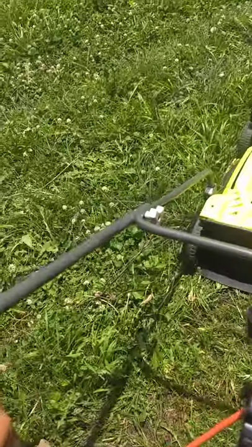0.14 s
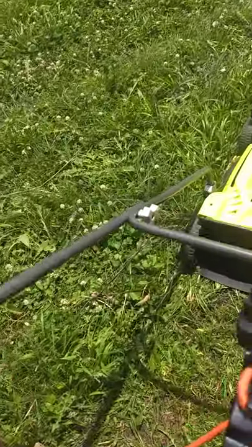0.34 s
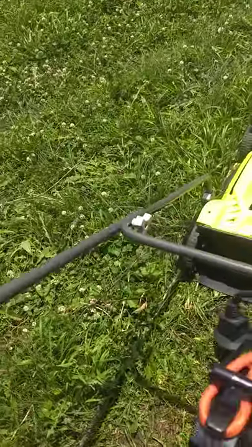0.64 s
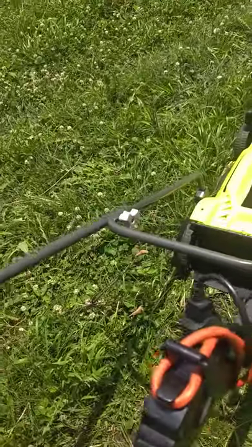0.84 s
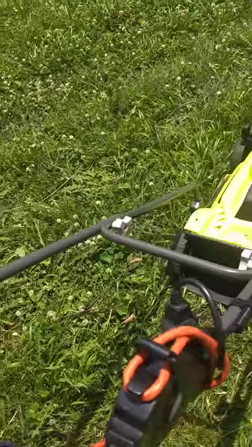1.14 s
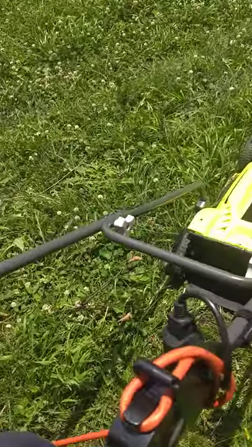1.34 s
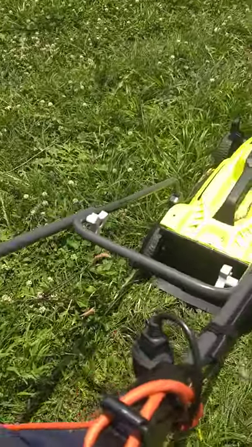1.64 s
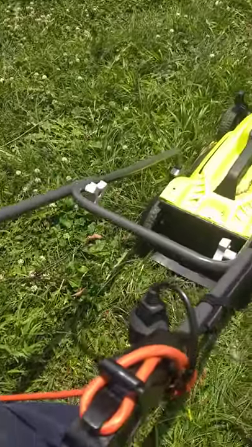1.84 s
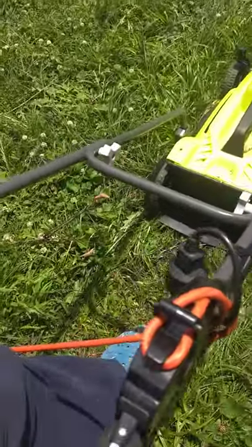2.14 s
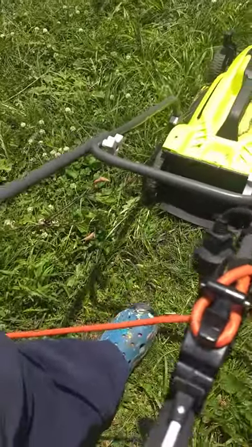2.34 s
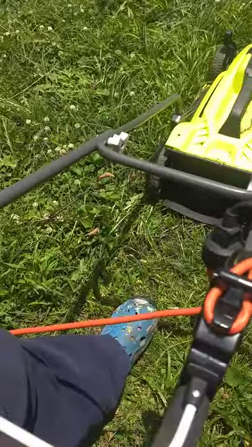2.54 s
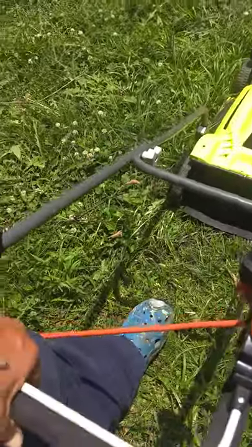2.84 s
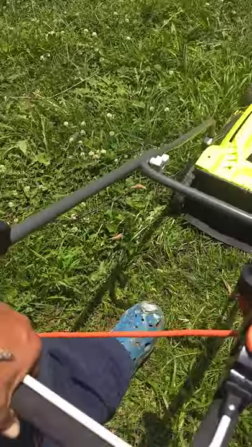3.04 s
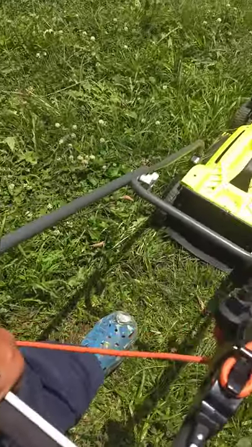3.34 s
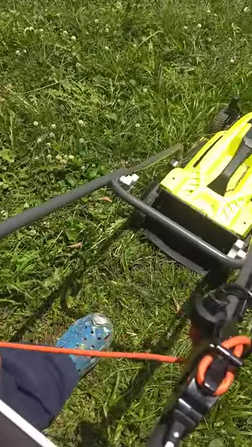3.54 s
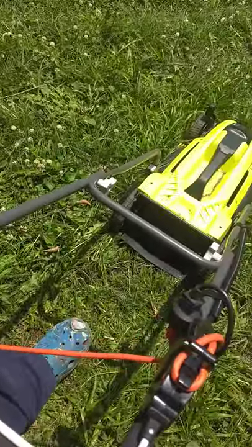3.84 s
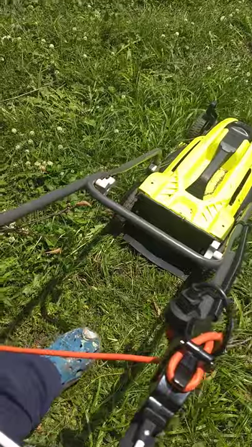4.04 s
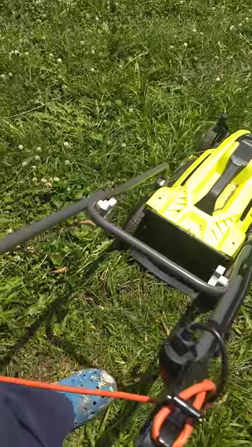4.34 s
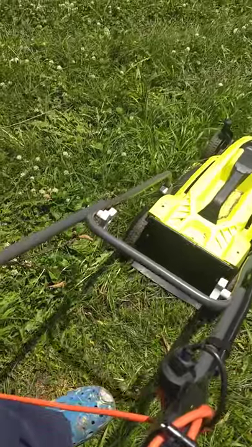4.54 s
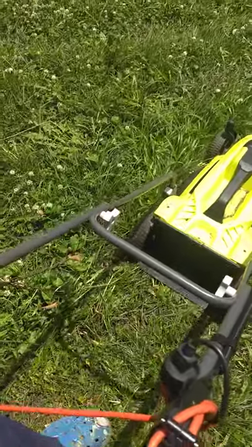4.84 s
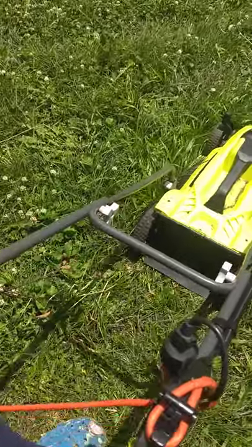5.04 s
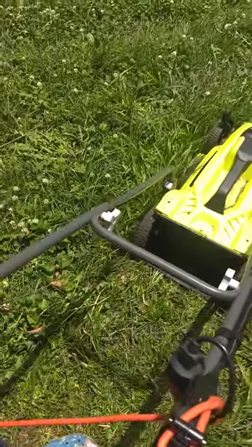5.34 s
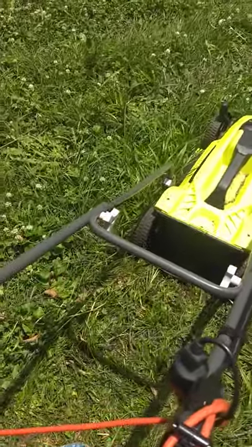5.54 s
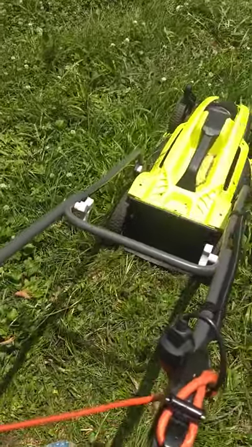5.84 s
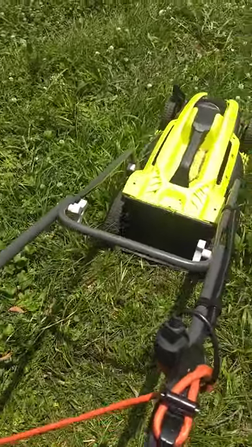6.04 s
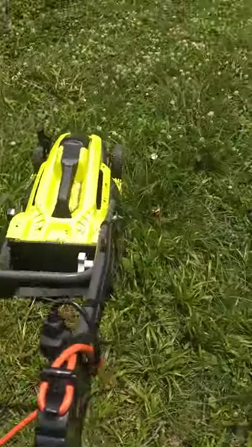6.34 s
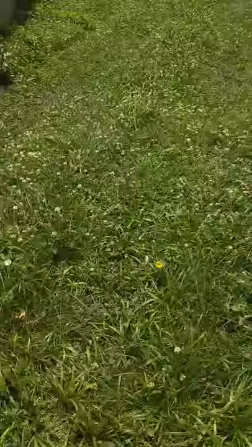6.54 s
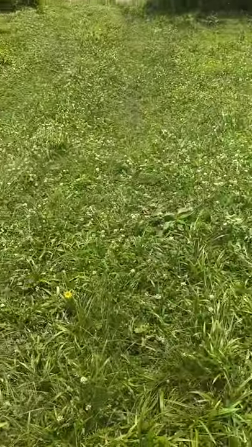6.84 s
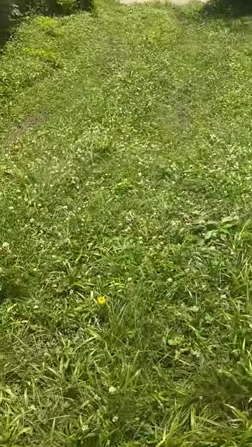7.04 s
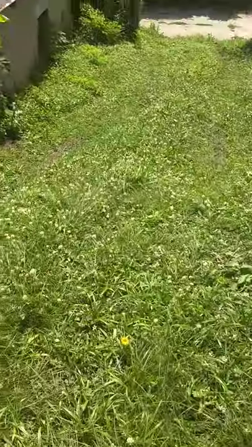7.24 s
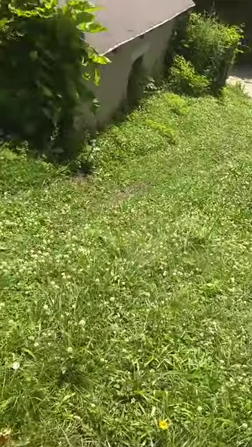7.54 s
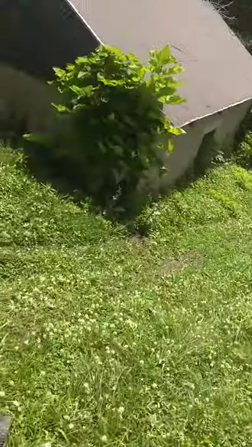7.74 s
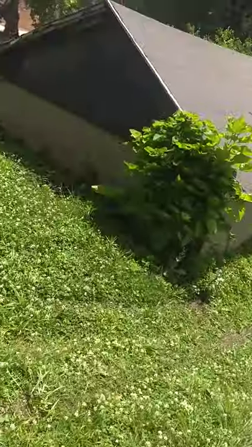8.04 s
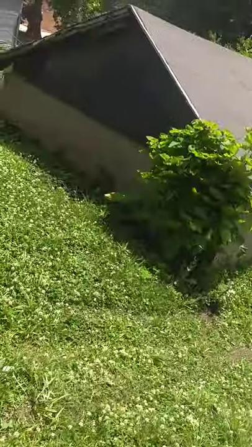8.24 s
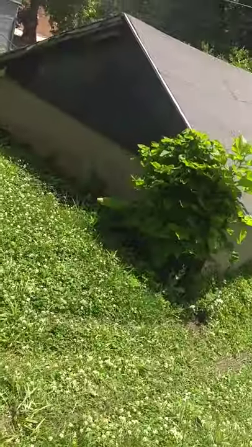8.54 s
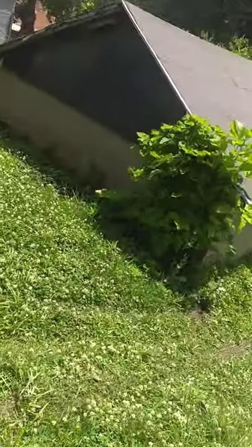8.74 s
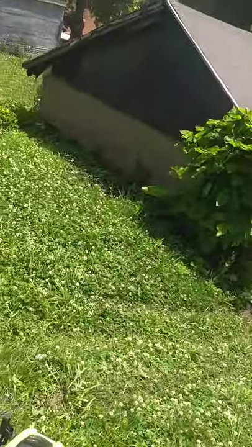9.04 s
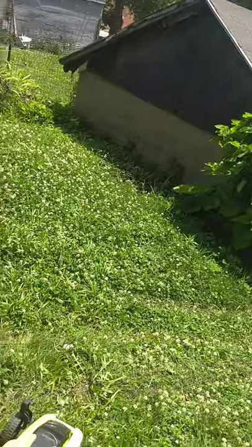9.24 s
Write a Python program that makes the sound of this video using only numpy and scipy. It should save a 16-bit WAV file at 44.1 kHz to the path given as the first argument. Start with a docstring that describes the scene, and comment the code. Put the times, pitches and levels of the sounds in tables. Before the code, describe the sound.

Outdoors on a lawn, a hand-held microphone close to a small electric mower. A steady buzzing hum, high motor whine and fluttering rush of cut grass sag and recover under load. Sharp plastic snaps come at the start and again in a cluster around six seconds, the motor briefly dipping behind some. Then the microphone turns away, the cutting softens, and low wind puffs arrive.

```python
"""A lawn of long grass: a corded electric mower cuts near a hand-held phone, its motor belted to a two-tipped blade.
Locked sine lines carry motor and blade, noise pulsed by the tips makes roar, cutting, swish and hiss; load sags the pitch.
Cord and handle snap as ringing noise bursts; the steady sound ducks after some snaps and creeps back.
Low noise puffs are wind on the two microphone ports. The phone turns away, and each channel subtracts
a late copy of the other port."""
import sys
import numpy as np
from scipy import signal
from scipy.fft import rfft, irfft, next_fast_len
from scipy.io import wavfile
from scipy.ndimage import uniform_filter1d

SR = 44100
rng = np.random.default_rng(int(sys.argv[2]) if len(sys.argv) > 2 else 0)


def amplitude_ratio(level_db):
    """Convert a level in decibels to the matching linear amplitude (field) ratio."""
    exponent = np.asarray(level_db, float) / 20
    return 10 ** exponent


def wav_out(sig):
    """Save sig, one row per channel (or a flat mono array), as 16-bit PCM at SR to the path in sys.argv[1]."""
    wavfile.write(sys.argv[1], SR, np.round(np.clip(np.atleast_2d(sig).T, -1, 1) * 32767).astype(np.int16))


N = 414099
T = np.arange(N) / SR

# Blade speed before smoothing: time_s, rate_passes_per_s
BLADE_SPEED = [(0.1, 102.9), (0.61, 106.4), (1.5, 109.1), (1.9, 108.9), (2.24, 106.1), (3.61, 110.1),
               (4.56, 110.5), (5.17, 103.8), (5.71, 102.5), (6.12, 99.0), (6.8, 99.7), (7.48, 106.1),
               (7.76, 107.4), (8.03, 107.2), (8.23, 106.1), (8.5, 103.1), (8.78, 101.9), (9.41, 103.0)]
# Blade lines, halves from the unequal tips: pass_rate_multiple, level_db (against their layer)
BLADE_LINES = [(1, -13), (2, -6), (2.5, -15.5), (3, -6), (3.5, -9), (4, -12), (5, -9.5), (6, -13.5),
               (7, -15.5), (8, -19), (9, -18), (10, -16)]
# Motor whine lines: shaft_rate_multiple, level_db (against the whine)
MOTOR_LINES = [(16, -5.5), (22, 0.5), (23.47, -14), (32, -8.5), (44, -12)]
# Colours of the noise layers, each normalised later: pitch_hz, relative_density_db
ROAR_COLOUR = [(40, -50), (150, -8.5), (190, -2.5), (330, 4.5), (470, 1.5), (700, -16), (1100, -34.5)]
CUT_COLOUR = [(350, -14), (600, 4), (950, -0.5), (1250, 3.5), (1800, 1), (2300, -12), (3200, -57)]
SWISH_COLOUR = [(1500, -26), (2400, 7), (3200, 2), (3850, 5.5), (5300, -9.5), (6300, -3.5), (7400, -5.5),
                (9500, -24)]
HISS_COLOUR = [(5000, -17), (8500, -14), (10500, -4.5), (14000, -2)]
PUFF_COLOUR = [(20, -18), (60, 2), (140, 8), (250, -0.5), (800, -36)]
WHISTLE_COLOUR = [(3550, -23), (3790, -5.5), (4050, -29.5)]
# Left port against right: pitch_hz, likeness_0_to_1, facing_db, facing_lag_rad, turned_db, turned_lag_rad
PORT_PATHS = [(197, 1, 0.5, 0.17, 1.5, 0.38), (664, 0.95, -6, 0.3, -7.5, 1.25),
              (990, 0.83, -2.5, 0, -0.5, 1.3), (1377, 1, -5.5, 0.75, -4, 2.55),
              (1550, 0.97, -19.5, 2, -5, 2.55), (2650, 0.93, -6, -1.5, -2, 4.4),
              (4130, 0.05, -5.5, 0.5, -32, 4), (4800, 0.4, 3.5, 2, 5, 7.7), (6350, 0.24, 1, -2, -2, 8.3),
              (10200, 0.13, -5.5, -5, -3.5, 5.9)]
# Phone swinging away: start_s, end_s
TURN_SPAN = (6.16, 6.85)
# Cord and handle snaps, drive before the resonances: start_s, drive_db, knock_db (against the snap), rattle_t60_s
SNAP_EVENTS = [(0.0273, -11, -7, 0.025), (0.716, -11.5, -1, .02), (0.7252, -4, -27, 0.027),
               (0.7475, -12.5, -9, 0.078), (5.7673, -24, -12, .03), (5.7858, -14.5, -2, .034),
               (5.8061, -12.5, 3, .034), (5.925, -17, 2, 0.036), (5.9742, -26.5, 19, .03),
               (5.9864, -16, -15, 0.085), (6.031, -18, -15, .03), (6.078, -7, -11, 0.061),
               (6.1186, -23, -6, 0.051), (6.1313, -6.5, -13, 0.021), (6.18, -20, -6, 0.051),
               (6.325, -17.5, -10, 0.06), (7.333, -18.5, -14, 0.057), (8.3847, -17, -22, 0.034)]
# Ducking of the steady sound: start_s, drop_db
DUCK_EVENTS = [(0.029, 8), (0.728, 9.5), (0.785, 13), (5.816, 8.5), (6.136, 14.5), (8.388, 11)]
# Wind puffs, added to a faint floor: middle_s, left_level_db
WIND_PUFFS = [(7.86, -34), (8.1, -20), (8.37, -22.5), (8.6, -24), (9.2, -28), (9.32, -28)]
# Grass cutting: time_s, cutting_level_db, treble_offset_db
CUT_LEVEL = [(0.0, -22, -2), (0.5, -23, -1.5), (1.3, -26.5, 0), (1.8, -25, -1.5), (2.4, -24, -2),
             (3.4, -20, -2.5), (4.4, -22, -1.5), (5.2, -24, -1.5), (6.0, -21.5, -2.5), (6.7, -29, -1.5),
             (7.4, -32, -2), (8.0, -28, 4.5), (8.7, -28, 4.5), (9.39, -28.5, 3)]
# Level laws against the cutting: unloaded_db, slope_db_per_unit_load, turned_extra_db
# (for whine and whistle the load is the lost speed alone, in passes per s)
ROAR_LAW = (-5.5, 0.26, 2.8)
SWISH_LAW = (-10.5, 0.13, 0.1)
HISS_LAW = (-11, 0.47, -1.1)
HUM_LAW = (0.067, -0.11, 5.7)
WHINE_LAW = (-16, -1.05, 3.8)
WHISTLE_LAW = (-12, -1.34, 6.9)
# Clearest thuds on a clump: start_s
CLUMP_TIMES = [2.602, 4.805, 5.119]
# Clearest cracks of a stalk: start_s
STALK_TIMES = [2.0231, 2.2086, 2.256, 2.369, 4.6376, 5.3869, 7.1803]
# Right port's wind against the left: facing_db, turned_db
LEE_LEVEL = (-28, -5.5)
# Pitches reinforced or cancelled as mower and phone shift: middle_s, half_length_s, pitch_hz, peak_db
PITCH_SWELLS = [(0.24, 0.34, 284, 9.5), (0.3, 0.53, 530, -14), (1.81, 0.2, 446.5, 18.5),
                (1.9, 1.64, 285.5, -15), (3.2, 1.4, 215, 5.5), (0.23, 0.38, 3790, -16),
                (3.3, 1.14, 110.3, -7), (4, 2.5, 755, 5.5), (2.94, 0.35, 4720, 7), (1.8, 0.3, 3790, -6.5),
                (3.95, 0.53, 4800, -12), (2.8, 0.35, 6420, 2), (3.86, 0.63, 9620, -13),
                (4.79, 0.38, 435.4, 16.5), (5.9, 3.1, 404.6, 8), (5.24, 0.37, 317.3, 12),
                (5.704, 0.37, 203, 10.5), (6.6, 0.55, 100.5, -8.5), (5.6, 0.5, 6200, -11),
                (6.9, 0.55, 6080, -5), (5.5, 0.65, 102, 3.5), (7.68, 0.48, 3790, 6.5),
                (6.42, 0.58, 202, -11.5), (7.6, 0.42, 321, 9), (7.6, 0.79, 437, 11.5),
                (8.497, 0.19, 211, -13), (9.27, 1.05, 310, 7)]

BELT_RATIO = 30 / 11  # motor turns per blade pass
FREE_RATE, INERTIA_S, LOAD_SMOOTH_S = 111.23, 0.31, 0.11  # passes per s unloaded; s; s
SHAFT_DB = -3.5  # the motor shaft's own line against the hum
CLUMP_SIZE, STALK_SIZE = 2.9, 2  # against an average random hit
HUM_TOP_HZ = 470  # blade lines above this follow the cutting
SWELL_WIDTH = 0.04  # share of the swell's pitch
SWELL_STEP = 512  # samples between swell values
WHISTLE_HZ = 3790
KNOCK_T60_S = 0.018
CROSS_LAG = 20  # samples


def unit(x):
    """Scales to rms 1."""
    return x / np.sqrt(np.mean(x ** 2) + 1e-20)


def along(points, hz):
    """Reads the columns of a spectrum table on a log pitch axis."""
    pitch_hz, *columns = np.transpose(points)
    return [np.interp(np.log(hz + 1), np.log(pitch_hz + 1), column) for column in columns]


def curves(rows):
    """Draws one value per sample for each column after the time."""
    time_s, *columns = np.transpose(rows)
    return [np.interp(T, time_s, column) for column in columns]


def wobble(rate):
    """Joins random knots with straight lines, rate knots a second."""
    knots = rng.standard_normal(int(N * rate / SR) + 4)
    return np.interp(T * rate, np.arange(len(knots)), knots)


def filtered(x, response):
    """Multiplies the spectrum by a complex response of frequency."""
    size = next_fast_len(N + 8192)
    spectrum = rfft(x, size) * response(np.fft.rfftfreq(size, 1 / SR))
    return irfft(spectrum, size)[..., :N]


def rush(colour, gate):
    """Makes two unrelated noises of one colour, gated alike."""
    noise = gate * rng.standard_normal((2, N))
    return unit(filtered(noise, lambda hz: amplitude_ratio(along(colour, hz)[0])))


def turned():
    """Runs from 0 while the phone faces the mower to 1 once it has swung away."""
    return np.interp(T, TURN_SPAN, [0, 1])


def mower():
    """Turns one blade speed into lines and air noise; row 2 is a second noise draw for what the ports do not share."""
    smooth = round(LOAD_SMOOTH_S * SR)
    rate = uniform_filter1d(curves(BLADE_SPEED)[0], smooth)
    angle = 2 * np.pi * np.cumsum(rate) / SR
    cut_db, treble_db = curves(CUT_LEVEL)
    lost_speed = FREE_RATE - rate
    # lost speed plus the braking felt over the inertia of motor and blade
    load = uniform_filter1d(lost_speed - INERTIA_S * SR * np.gradient(rate), smooth)
    # each tip's pass sweeps a puff of air and grass; one tip is stronger
    sweep = np.cos(angle) + 0.47 * np.cos(angle / 2) + 0.55 * np.cos(2 * angle)
    air = air_noise(rate, angle, sweep, load, cut_db, treble_db)
    tones = drive_lines(rate, angle, load, lost_speed, cut_db)
    tones += whistle(rate, sweep, lost_speed, cut_db)
    return np.array([tones + air[0], air[1]])


def layer_db(law, cut_db, load):
    """A layer follows the cutting, the load and the turn of the phone."""
    unloaded_db, per_load_db, turned_db = law
    return cut_db + unloaded_db + per_load_db * load + turned_db * turned()


def swell_db(hz):
    """Shifting positions reinforce or cancel narrow bands; hz is one pitch or a pitch per sample."""
    coarse_s = T[::SWELL_STEP]
    coarse_hz = hz[::SWELL_STEP] if np.ndim(hz) else hz
    total_db = 0
    for middle_s, half_s, centre_hz, db in PITCH_SWELLS:
        near_time = ((coarse_s - middle_s) / half_s) ** 2
        near_pitch = (np.log(coarse_hz / centre_hz) / SWELL_WIDTH) ** 2
        total_db += db * np.exp(-near_time - near_pitch)
    return np.interp(T, coarse_s, total_db)


def line(multiple, rate, angle, level_db):
    """A sine locked to the blade; lines nearly in step add up to one beat per pass."""
    gain = amplitude_ratio(level_db + swell_db(multiple * rate))
    return gain * np.sqrt(2) * np.cos(multiple * angle + rng.normal(0, 0.72))


def drive_lines(rate, angle, load, lost_speed, cut_db):
    """Shaft, blade and motor whine share one rotation through the belt ratio."""
    hum_db = layer_db(HUM_LAW, cut_db, load)
    whine_db = layer_db(WHINE_LAW, cut_db, lost_speed)
    tones = line(BELT_RATIO, rate, angle, hum_db + SHAFT_DB + 2.54 * wobble(8.4))
    for multiple, db in BLADE_LINES:
        # low lines carry round the phone, upper ones are shaded like the cutting
        if multiple * FREE_RATE < HUM_TOP_HZ:
            level_db = hum_db
        else:
            level_db = cut_db + 1.4 * turned() + 2.9 * wobble(3.2)
        tones += line(multiple, rate, angle, level_db + db)
    for multiple, db in MOTOR_LINES:
        tones += line(multiple * BELT_RATIO, rate, angle, whine_db + db + 3.8 * wobble(4.9))
    return tones


def whistle(rate, sweep, lost_speed, cut_db):
    """A housing resonance sings unsteadily, pumped by the passes, in a halo of air noise."""
    level_db = layer_db(WHISTLE_LAW, cut_db, lost_speed) + swell_db(WHISTLE_HZ)
    pitch_hz = WHISTLE_HZ + 5 * (rate - 108) + 9 * wobble(30)
    gain = amplitude_ratio(level_db + 1.5 + 1.7 * wobble(20) + 2.6 * sweep)
    tone = gain * np.sin(2 * np.pi * np.cumsum(pitch_hz) / SR)
    halo = amplitude_ratio(level_db - 3.0) * rush(WHISTLE_COLOUR, 1)[0]
    return tone + halo


def grass_hits(rate, angle, load):
    """Some passes thud on a clump or crack a stalk, more often under load: sudden rises that fade in milliseconds."""
    passes = np.diff(angle // (2 * np.pi), prepend=0)
    chance = (9 + 3 * np.abs(load)) / rate
    struck = rng.random((2, N)) < chance
    hits = passes * struck * np.minimum(rng.exponential(size=(2, N)), 1.6)
    for row, (times, size) in enumerate([(CLUMP_TIMES, CLUMP_SIZE), (STALK_TIMES, STALK_SIZE)]):
        hits[row, np.round(np.multiply(times, SR)).astype(int)] = size
    fades = np.exp(-T[:SR // 20] / [[0.004], [0.003]])  # time constants in s: clump, stalk
    return signal.fftconvolve(hits, fades, axes=1)[:, :N]


def air_noise(rate, angle, sweep, load, cut_db, treble_db):
    """Tip sweeps and grass hits pulse four noises: roar, cutting, swish and hiss."""
    tuft = wobble(16)  # thicker and thinner grass under the blade
    clumps, stalks = grass_hits(rate, angle, load)
    roar_db = layer_db(ROAR_LAW, cut_db, load)
    swish_db = layer_db(SWISH_LAW, cut_db, load) + 0.87 * treble_db
    hiss_db = layer_db(HISS_LAW, cut_db, load) + treble_db
    air = amplitude_ratio(roar_db) * rush(ROAR_COLOUR, amplitude_ratio(1.9 * sweep + 1.8 * clumps))
    air += amplitude_ratio(cut_db + 0.75 * tuft) * rush(CUT_COLOUR, amplitude_ratio(1.25 * sweep + 3.2 * clumps))
    air += amplitude_ratio(swish_db + 1.3 * tuft) * rush(SWISH_COLOUR, amplitude_ratio(0.47 * sweep + 3.7 * stalks))
    air += amplitude_ratio(hiss_db + 1.2 * tuft) * rush(HISS_COLOUR, amplitude_ratio(0.99 * sweep + 8.2 * stalks))
    return air


def ring(hz, centre_hz, width_hz):
    """A damped resonance, as a band-pass response."""
    damping = 1j * hz * width_hz
    return damping / (centre_hz * centre_hz - hz * hz + damping)


def snaps():
    """Each snap of cord or handle is a bright burst with a plastic ring and a duller knock."""
    bright, dull, t = np.zeros((2, N + SR)), np.zeros(N + SR), T[:SR // 8]
    for start_s, db, knock_db, rattle_t60 in SNAP_EVENTS:
        start = round(start_s * SR)
        crack = amplitude_ratio(db + 3.0 - 60 * t / 0.0071)
        rattle = amplitude_ratio(db - 5.5 - 60 * t / rattle_t60)
        onset = 1 - np.exp(-t / (0.012 * rattle_t60))  # long rattles start softer
        bright[:, start:][:, :len(t)] += (crack + rattle) * onset * rng.standard_normal((2, len(t)))
        knock = amplitude_ratio(db + knock_db - 60 * t / KNOCK_T60_S) * np.minimum(t / 0.0006, 1)
        dull[start:][:len(t)] += knock * (1.0 + rng.standard_normal(len(t)))  # a push plus noise
    out = filtered(bright[:, :N], lambda hz: 1.09 * ring(hz, 2960, 1660) + 0.27 * ring(hz, 11300, 17000))
    out[0] += filtered(dull[:N], lambda hz: 7 * ring(hz, 1150, 1040) ** 2
                       + 0.51 * ring(hz, 380, 400) + 0.19 * ring(hz, 55, 90))
    return out


def wind():
    """Low noise puffs, unrelated on the two ports; the right port is in the lee."""
    gain = amplitude_ratio(-42.0) + sum(amplitude_ratio(db) * np.exp(-((T - middle_s) / 0.061) ** 2) for middle_s, db in WIND_PUFFS)
    facing_db, turned_db = LEE_LEVEL
    lee = amplitude_ratio(facing_db + (turned_db - facing_db) * turned())
    return np.array([gain, gain * lee]) * rush(PUFF_COLOUR, 1)


def ducking():
    """The level falls within 2 ms and climbs back at 12 dB a second; the deepest dip rules."""
    dips = []
    for start_s, drop_db in DUCK_EVENTS:
        fall = np.clip((T - start_s) / .002, 0, 1)
        dips.append(fall * np.minimum(12 * (T - start_s) - drop_db, 0))
    return amplitude_ratio(np.min(dips, axis=0))


def left_path(pair, pose):
    """The left port in one pose (0 facing, 1 turned): shared sound recoloured and lagged, plus sound of its own."""
    def response(hz):
        """Gives the gains of the shared sound and of the port's own."""
        likeness, *poses = along(PORT_PATHS, hz)
        likeness = np.clip(likeness, 0, 1)
        db, lag_rad = poses[2 * pose:2 * pose + 2]
        return amplitude_ratio(db) * np.array([likeness * np.exp(-1j * lag_rad), np.sqrt(1 - likeness ** 2)])
    return filtered(pair, response).sum(axis=0)


def ports(pair):
    """The left port crossfades between its two poses; the right port hears the first row as it is."""
    left = (1 - turned()) * left_path(pair, 0) + turned() * left_path(pair, 1)
    return np.array([left, pair[0]])


def scene():
    """Mower, snaps and wind as the two ports hear them, with mower and wind ducked."""
    duck = ducking()
    return ports(duck * mower() + snaps()) + duck * wind()


def top_cut(x):
    """Nothing passes above the cut-off."""
    return signal.sosfilt(signal.butter(12, 16480, fs=SR, output="sos"), x)


def record(dry):
    """Each channel takes away a late copy of the other port, which widens the picture; peaks beyond full scale clip."""
    late = np.pad(dry[::-1], ((0, 0), (CROSS_LAG, 0)))[:, :N]
    # the copy is a little duller at the top
    wide = dry - filtered(late, lambda hz: 0.65 / (1 + (hz / 17000) ** 4))
    # the microphones lose the deepest bass; the top ends sharply at 15750 Hz
    wide = filtered(wide, lambda hz: (hz < 15750) * hz ** 2 / (hz ** 2 + 55 ** 2))
    return top_cut(np.clip(wide, -1, 1))


dry = scene()
out = record(dry)
wav_out(out)
```